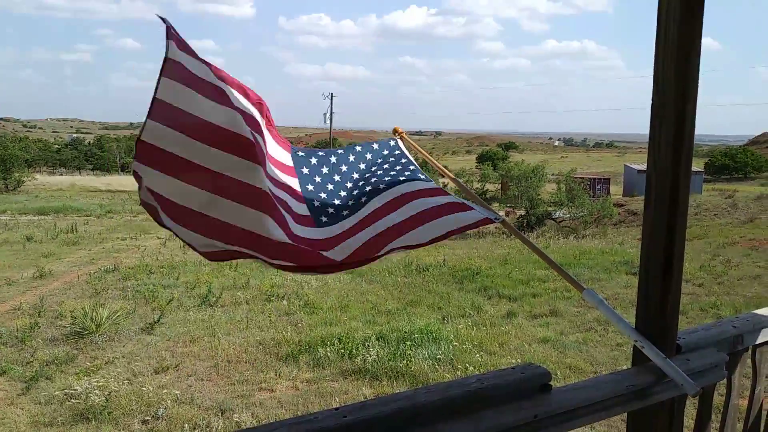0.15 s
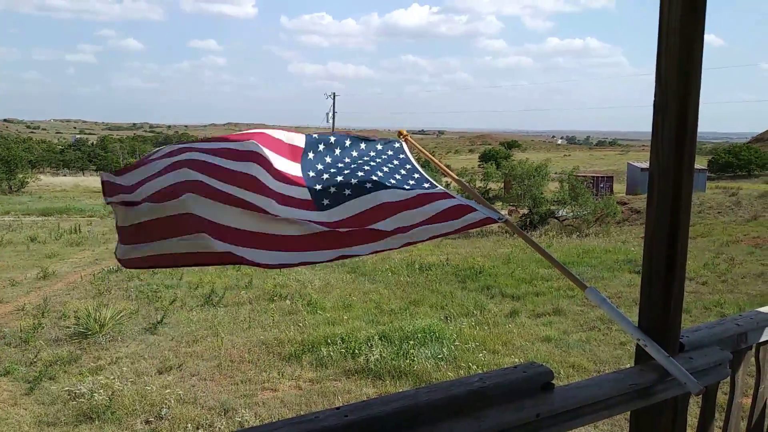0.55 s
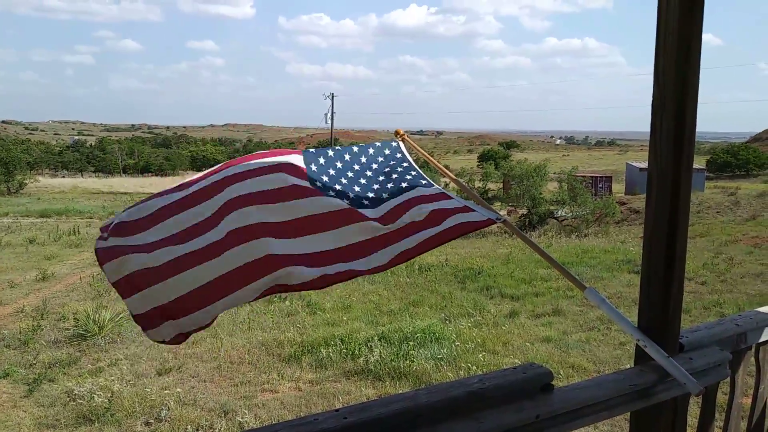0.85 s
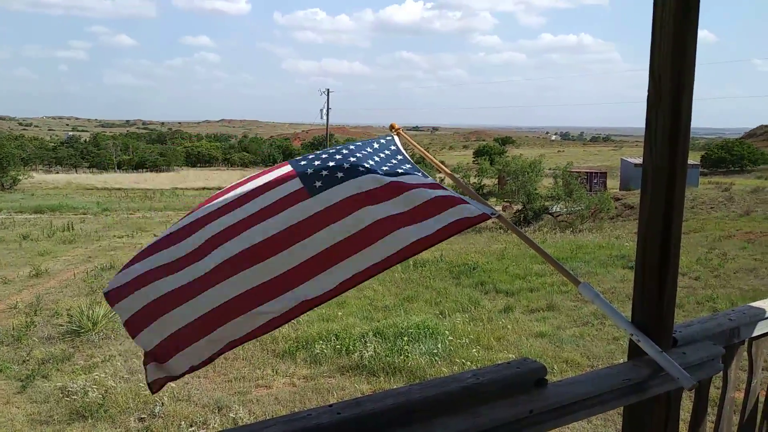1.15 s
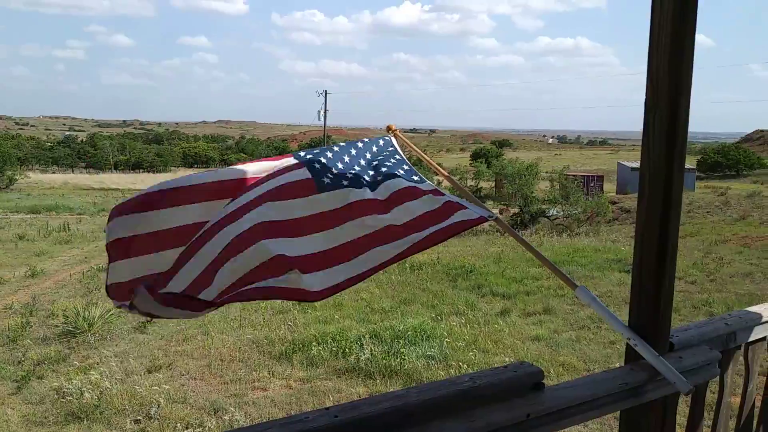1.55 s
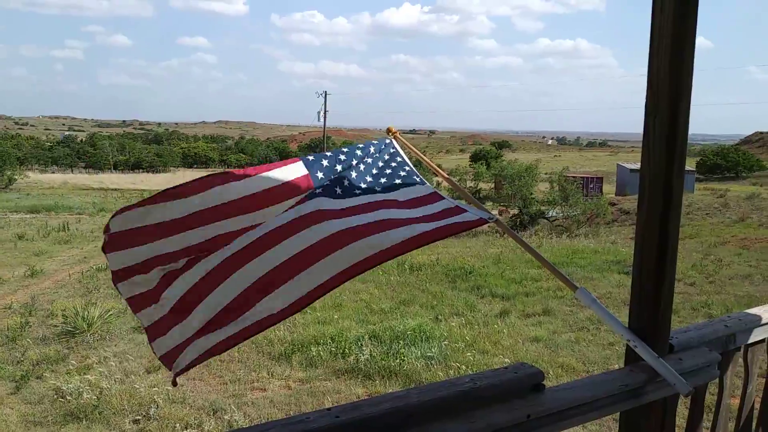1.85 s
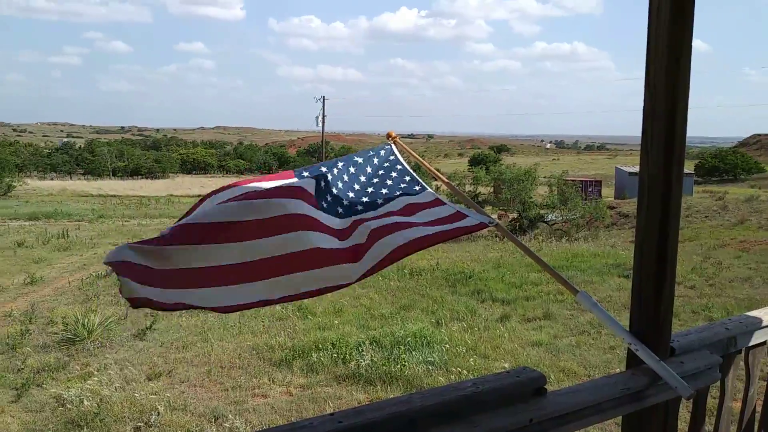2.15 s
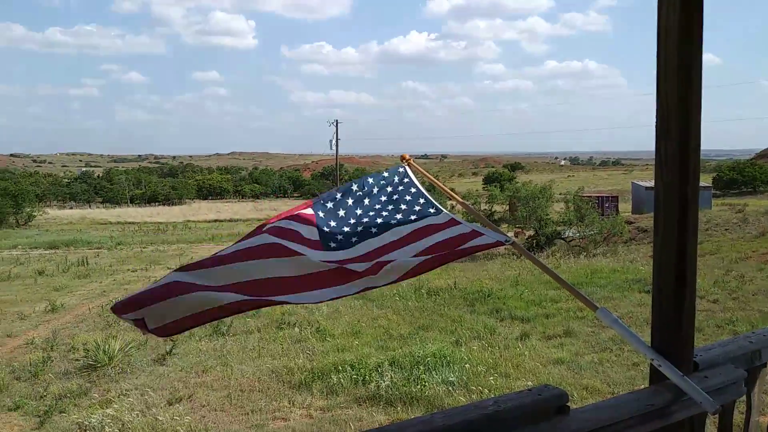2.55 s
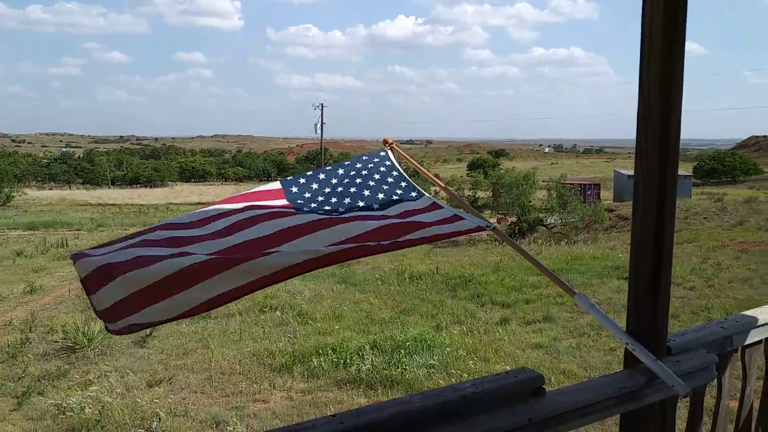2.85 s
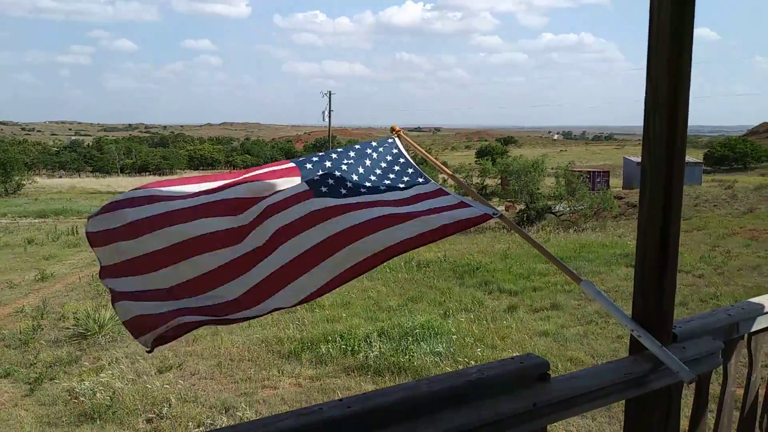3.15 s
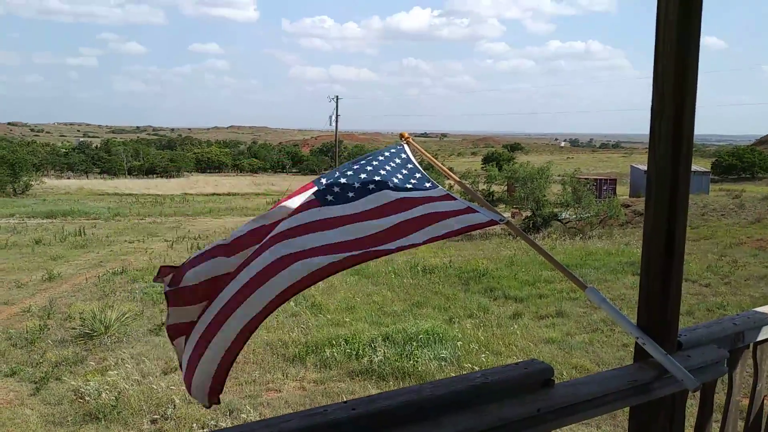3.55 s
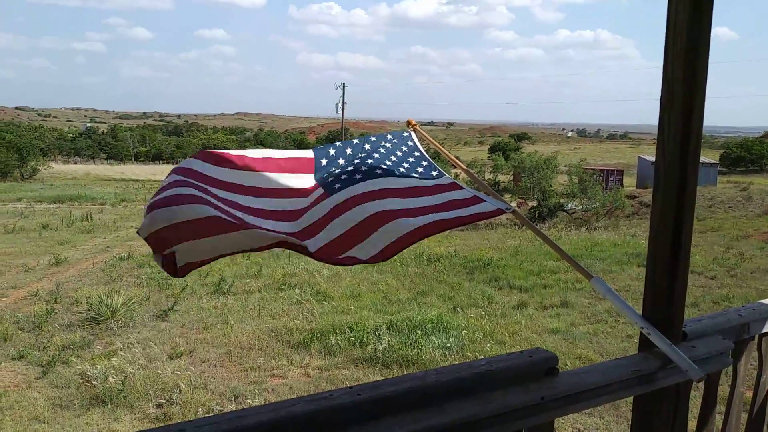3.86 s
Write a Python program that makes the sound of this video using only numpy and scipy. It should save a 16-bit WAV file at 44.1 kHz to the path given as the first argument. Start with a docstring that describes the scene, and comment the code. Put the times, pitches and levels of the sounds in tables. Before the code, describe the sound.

Wind blows on an unshielded microphone on an open porch beside a flag: a faint steady rush with small low thumps, then a sudden loud gust that booms and crackles, easing into uneven rumble.

```python
"""Light wind thumps over a steady far rush, then a hard gust that booms, cracks and drives a limiter.
The scene is an open porch beside a flag over grassland; airflow and eddies are low-passed noise
shaped by the microphone port. Far wind and grass hiss are noise with a set spectrum, and hollow tones
are narrow bands of noise. Filtered pulses make the overload cracks and the ticks of the flag and its
fittings; a distant bird chirps faintly in short sine tones that fall in pitch."""
import sys
import numpy as np
from scipy import signal
from scipy.fft import rfft, irfft
from scipy.io import wavfile
from scipy.ndimage import uniform_filter1d, minimum_filter1d

SR = 44100
rng = np.random.default_rng(int(sys.argv[2]) if len(sys.argv) > 2 else 0)


def bounce(signal):
    """Save signal as a 16-bit WAV file at the path given by the first command-line argument."""
    frames = np.transpose(np.atleast_2d(signal))
    limited = np.clip(frames, -1, 1)
    pcm = np.round(limited * 32767).astype(np.int16)
    wavfile.write(sys.argv[1], SR, pcm)


N = 176400   # 4 s

# Event and layer levels are set ahead of the port filter and the limiter.
# eddies that hit the microphone, levels before BUFFET_GAIN_DB:
# (centre time [s], length [s], level [dB], corner frequency [Hz])
BUFFETS = [(0.056, 0.079, -25, 170), (0.109, 0.057, -25.5, 140), (0.177, 0.067, -28.5, 133),
           (0.437, 0.031, -34.5, 380), (0.616, 0.035, -25, 168), (0.713, 0.027, -28.5, 166),
           (1.153, 0.055, -27, 188), (1.218, 0.031, -41, 171), (1.275, 0.047, -22.5, 168),
           (1.351, .015, -26.5, 174), (1.469, 0.042, -28.5, 194), (1.615, 0.031, -29.5, 109),
           (1.911, .026, -8.5, 228), (1.947, 0.032, -6.5, 312), (1.969, 0.017, -1, 330),
           (2.005, .025, -1.5, 326), (2.051, 0.053, -12.5, 210), (2.131, .019, -1.5, 745),
           (2.152, 0.021, -1, 389), (2.178, 0.015, -1, 247), (2.203, 0.034, -5, 340),
           (2.292, 0.0064, 0.5, 315), (2.352, 0.02, -1, 350), (2.378, 0.037, -9, 424),
           (2.422, 0.0093, -1.5, 444), (2.497, 0.005, -8.5, 240), (2.524, 0.031, -5, 438),
           (2.551, 0.06, -9.5, 233), (2.604, 0.027, -8, 193), (2.643, 0.034, -3.5, 216),
           (2.677, 0.0091, -1, 259), (2.734, 0.028, -7, 225), (2.829, 0.047, -13, 370),
           (2.889, 0.025, -11, 275), (2.96, 0.024, -12, 352), (3.002, 0.014, -12, 434),
           (3.056, 0.036, -8, 254), (3.099, 0.018, -14.5, 353), (3.151, 0.038, -4.5, 312),
           (3.188, 0.012, -6, 191), (3.295, 0.01, -20, 243), (3.323, 0.026, -5.5, 197),
           (3.4, .05, -10, 227), (3.48, 0.01, -9.5, 174), (3.577, 0.011, -3, 215), (3.612, 0.03, -10, 272),
           (3.865, 0.014, -14, 256), (3.905, 0.018, -12, 142)]
BUFFET_GAIN_DB, BUFFET_LUMP_DB, BUFFET_LUMP_RATE_HZ = 1.16, 3.5, 147
BUFFET_SQUARENESS = 3.1   # exponent: 2 is a bell, more is a flatter top with steeper sides

# steady airflow over the microphone, before its random lumps: (time [s], level [dB])
FLOW = [(0, -57), (.13, -39), (.28, -57), (.5, -42), (.62, -36), (.76, -32.5), (.9, -58), (1.03, -38.5),
        (1.2, -28.5), (1.4, -42), (1.52, -38.5), (1.72, -50.5), (1.86, -31), (1.95, -10.5), (2.25, -16.5),
        (2.47, -12.5), (2.6, -13), (2.78, -21.5), (3.15, -20.5), (3.22, -25), (3.35, -19), (3.55, -21),
        (3.66, -18), (3.82, -24.5), (4, -24.5)]
FLOW_CORNER_HZ, FLOW_REF_DB = 183.6, -14.5   # this corner belongs to this level
FLOW_DB_PER_OCTAVE = 72   # rise in level that lifts the corner by one octave
FLOW_LUMP_DB, FLOW_LUMP_RATE_HZ = 5, 11.7

# turbulence spectrum, and the smoothing of its loudness
CORNER_Q, SECOND_CORNER_RATIO, LOW_CUT_HZ = 0.92, 3.12, 43.8
EVEN_S, EVEN_SHARE = 0.0064, 0.25   # averaging time; share of the loudness swings in dB removed

# the microphone port booms and muffles
PORT_HZ, PORT_Q, PORT_BOOST_DB, PORT_SUB_CUT_HZ, PORT_TOP_HZ = 187, 0.72, 3, 49, 3130

# overload cracks at the crest of the hardest eddies: (time [s], peak [dB], top frequency [Hz])
CRACKS = [(1.962, -19, 3000), (1.969, -18, 2970), (2.005, -10.5, 1510), (2.141, -36, 2470),
          (2.156, -10, 2600), (2.291, -18, 1410), (2.347, -21, 1200), (2.381, -6, 1500),
          (2.422, -7.5, 3430), (3.136, -10, 900)]
CRACK_DECAY_S = .0003   # of the pulse before filtering

# spectrum of far wind in grass and trees: (frequency [Hz], relative density [dB])
RUSH = [(30, -47), (60, -15.5), (120, -3.5), (230, 0), (350, -1.5), (520, -10.5), (680, -2.5), (900, -5.5),
        (1300, -6), (1580, -13.5), (1900, -10.5), (2150, -15.5), (2600, -16), (3050, -30.5), (3550, -24.5),
        (5000, -35), (6000, -29.5), (6800, -27.5), (8000, -34), (9700, -34.5), (12000, -60.5), (14000, -49),
        (15700, -39.5)]
RUSH_DB, RUSH_WAVER_DB, RUSH_WAVER_RATE_HZ = -38, .5, 8   # level before the echo is added
PORCH_ECHO_S, PORCH_ECHO_DB = .0093, -8.5

# hiss of the grass, which rises during the gust: (time [s], level [dB])
HISS_LEVEL = [(0, -67), (2.2, -68.5), (2.95, -59), (3.5, -59), (4, -62.5)]
# spectrum of that hiss: (frequency [Hz], relative density [dB])
HISS = [(2000, -19), (4000, -3.5), (6000, 0), (9500, -3.5), (12000, -10), (15700, -28)]

# hollow resonances that the wind stirs around the porch: (frequency [Hz], width [Hz], level [dB])
HOLLOWS = [(294, 15, -51), (423.6, 31, -45.5), (638, 48, -43), (741, 16, -49), (838, 25, -47),
           (930, 16, -48.5), (1190, 24, -56.5), (1720, 18, -55.5)]

# ticks of the flag and its fittings: (time [s], peak [dB], centre frequency [Hz])
TICKS = [(.106, -37, 3770), (0.419, -38, 3970), (.765, -45, 4600), (1.077, -39, 4800), (1.662, -43, 4400),
         (3.222, -37, 3400), (3.488, -36, 9400)]
TICK_DECAY_S = 0.0017   # of the burst before filtering
TICK_LOG_WIDTH = .45   # natural log of the ratio between the band edges

# chirps of a distant bird: (start time [s], peak level [dB])
CHIRPS = [(1.907, -52), (2.926, -53), (3.034, -51), (3.43, -59), (3.59, -54), (3.63, -55), (3.81, -55),
          (3.88, -56)]
CHIRP_START_HZ, CHIRP_S, CHIRP_FALL_HZ_PER_S = 4400, 0.02, 16000

# limiter, and the upper limit of the output band
CEILING_DB, LIMITER_ATTACK_S, LIMITER_RELEASE_S = -1.0, 0.0013, 0.15
CUTOFF_HZ = 15750


def from_db(db):
    """Amplitude ratio: 20 dB is a factor of ten."""
    return 10 ** (np.asarray(db) / 20)


def rms_one(x):
    """Normalisation to unit mean power."""
    return x / np.sqrt(np.mean(x ** 2) + 1e-20)


def seconds():
    """Sampled time axis: each sample lies one period after the last."""
    return np.arange(N) / SR


def in_time(rows):
    """Linear interpolation between (time, value) points."""
    return np.interp(seconds(), *np.transpose(rows))


def butter(x, hz, kind="low", order=2):
    """Butterworth filtering: a maximally flat pass band."""
    safe_hz = np.clip(hz, 10, .45 * SR)
    sections = signal.butter(order, safe_hz, kind, fs=SR, output="sos")
    return signal.sosfilt(sections, x + 1e-18)


def drift(rate_hz, size=N):
    """Slow random fluctuation: low-passed noise of unit power."""
    settle = SR // 2   # dropped, so that the filter has settled
    slow = butter(rng.standard_normal(size + settle), rate_hz)
    return rms_one(slow[settle:])


def coloured_noise(spectrum):
    """Spectral shaping: white noise weighted over frequency, then scaled to unit power."""
    hz, db = np.transpose(spectrum)
    bin_hz = np.arange(N // 2 + 1) * SR / N
    gain = from_db(np.interp(np.log(bin_hz + 1), np.log(hz), db))
    return rms_one(irfft(rfft(rng.standard_normal(N)) * gain, N))


def evened(x):
    """Envelope compression: within one eddy the pressure swings keep a similar size."""
    smooth_hz = 1 / (2 * np.pi * EVEN_S)
    power = butter(abs(signal.hilbert(x)) ** 2, smooth_hz, order=1)
    power = butter(power[::-1], smooth_hz, order=1)[::-1]   # the backward pass cancels the delay
    floor = 0.081 * power.mean()
    return x / (power + floor) ** (EVEN_SHARE / 2)


def turbulence(noise, corner_hz):
    """Turbulent pressure: flat to the corner, ever steeper above, with the deepest bass cut."""
    w = 2 * np.pi * corner_hz
    resonant_low_pass = signal.bilinear([w * w], [1, w / CORNER_Q, w * w], SR)
    low = signal.lfilter(*resonant_low_pass, noise)
    steeper = butter(low, corner_hz * SECOND_CORNER_RATIO)
    return butter(steeper, LOW_CUT_HZ, "high", order=4)


def buffets():
    """Eddy impact: each is a short, flat-topped swell of turbulence with its own strength and size."""
    size = SR // 4
    out = np.zeros(N + SR)
    t = (np.arange(size) - size // 2) / SR
    for centre_s, length_s, db, corner_hz in BUFFETS:
        bell = np.exp(-abs(2 * t / length_s) ** BUFFET_SQUARENESS / 2)
        lumps = from_db(BUFFET_LUMP_DB * drift(BUFFET_LUMP_RATE_HZ, size))
        noise = rng.standard_normal(size) * lumps
        swell = bell * evened(turbulence(noise, corner_hz))
        to_bell_energy = np.sqrt(np.sum(bell ** 2) / np.sum(swell ** 2))
        start = int(centre_s * SR)
        out[start:start + size] += from_db(db + BUFFET_GAIN_DB) * swell * to_bell_energy
    return out[size // 2:size // 2 + N]   # the trim puts each centre at its table time


def airflow():
    """Flow noise: a lumpy rumble whose corner frequency climbs with its level, as faster air is brighter."""
    level_db = in_time(FLOW) + FLOW_LUMP_DB * drift(FLOW_LUMP_RATE_HZ)
    octave = np.clip((level_db - FLOW_REF_DB) / FLOW_DB_PER_OCTAVE, -1, 1)
    rumble = 0
    for k in (-1, 0, 1):   # equal-power blend of three corners an octave apart
        share = np.maximum(1 - abs(octave - k), 0)
        layer = turbulence(rng.standard_normal(N), FLOW_CORNER_HZ * 2. ** k)
        rumble = rumble + np.sqrt(share) * rms_one(evened(layer))
    return from_db(level_db) * rumble


def port(x):
    """Port resonance: a broad boom in the low mids, with the deepest bass and the treble cut."""
    boom = signal.lfilter(*signal.iirpeak(PORT_HZ, PORT_Q, fs=SR), x)
    boosted = boom + from_db(-PORT_BOOST_DB) * (x - boom)
    no_sub = butter(boosted, PORT_SUB_CUT_HZ, "high", order=4)
    return butter(no_sub, PORT_TOP_HZ, order=4)


def snap(start_s, peak_db, decay_s, hz, kind, grit=1):
    """Impulse excitation: a filtered, decaying pulse; grit turns it from a clean click into noise."""
    age = seconds() - start_s
    decay = (age >= 0) * np.exp(-abs(age) / decay_s)
    texture = 1 - grit + grit * rng.standard_normal(N)
    burst = butter(texture * decay, hz, kind)
    return from_db(peak_db) * burst / abs(burst).max()


def cracks():
    """Overload: the microphone cracks under the hardest eddies, heard as low-passed, nearly clean pulses."""
    return sum(snap(s, db, CRACK_DECAY_S, hz, "low", grit=.1) for s, db, hz in CRACKS)


def ticks():
    """Small impacts of the flag and its fittings: decaying noise in a narrow bright band."""
    band_ratio = np.exp(np.array([-1, 1]) * TICK_LOG_WIDTH / 2)
    return sum(snap(s, db, TICK_DECAY_S, hz * band_ratio, "band") for s, db, hz in TICKS)


def far_wind():
    """Broadband wind noise: a rush from the fields with one porch reflection, and the hiss of the grass."""
    rush = coloured_noise(RUSH) * from_db(RUSH_WAVER_DB * drift(RUSH_WAVER_RATE_HZ))
    echo = from_db(PORCH_ECHO_DB) * np.roll(rush, int(PORCH_ECHO_S * SR))
    hiss = from_db(in_time(HISS_LEVEL)) * coloured_noise(HISS)
    return from_db(RUSH_DB) * (rush + echo) + hiss


def hollows():
    """Resonance: noise in narrow bands gives breathy tones that stay at a fixed pitch."""
    out = 0
    for hz, width_hz, db in HOLLOWS:
        edges_hz = [hz - width_hz / 2, hz + width_hz / 2]
        tone = butter(rng.standard_normal(N + SR), edges_hz, "band", order=1)[SR:]
        out = out + from_db(db) * rms_one(tone)
    return out


def bird():
    """Frequency glide: short whistles, each a half-sine swell whose pitch falls linearly."""
    out = 0
    for start_s, db in CHIRPS:
        age = np.clip(seconds() - start_s, 0, CHIRP_S)
        swell = np.sin(np.pi * age / CHIRP_S)
        cycles = age * (CHIRP_START_HZ - CHIRP_FALL_HZ_PER_S * age / 2)   # integral of the pitch
        out = out + from_db(db) * swell * np.sin(2 * np.pi * cycles)
    return out


def scene():
    """Superposition: all pressures add at one microphone; only airflow and eddies pass its port filter."""
    near_wind = port(buffets() + airflow())
    mix = near_wind + cracks() + ticks() + far_wind() + hollows() + bird()
    return mix[None]


def record(dry):
    """Peak limiting: gain drops just ahead of each peak and recovers slowly; a low-pass cuts the top."""
    over_db = np.maximum(20 * np.log10(abs(dry[0]) + 1e-9) - CEILING_DB, 0)
    fade = np.exp(-seconds() / LIMITER_RELEASE_S)
    duck_db = np.maximum.accumulate(over_db / fade) * fade   # peak hold with exponential release
    ahead = int(LIMITER_ATTACK_S * SR)
    held_db = minimum_filter1d(-duck_db, 2 * ahead + 1)
    gain_db = uniform_filter1d(uniform_filter1d(held_db, ahead), ahead)
    top_cut = signal.ellip(12, .1, 90, CUTOFF_HZ, fs=SR, output="sos")
    return signal.sosfilt(top_cut, dry * from_db(gain_db))


dry = scene()
out = record(dry)
bounce(out)
```